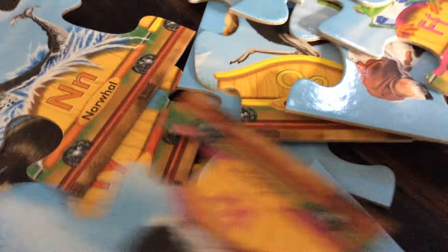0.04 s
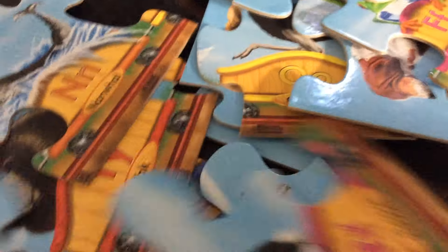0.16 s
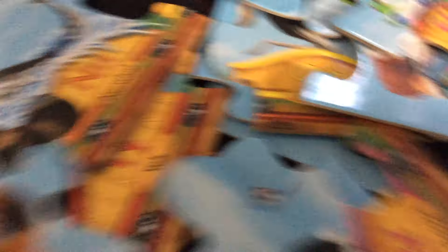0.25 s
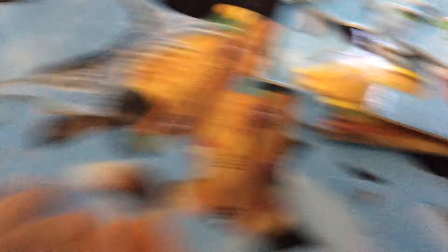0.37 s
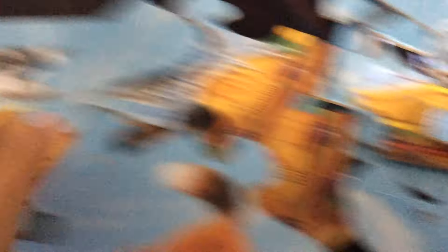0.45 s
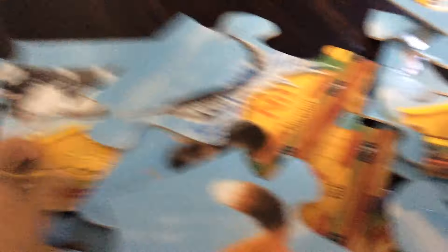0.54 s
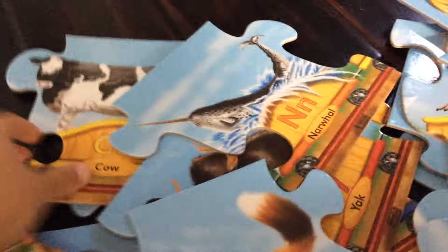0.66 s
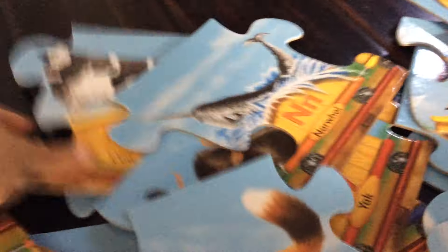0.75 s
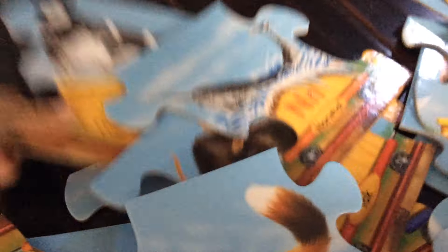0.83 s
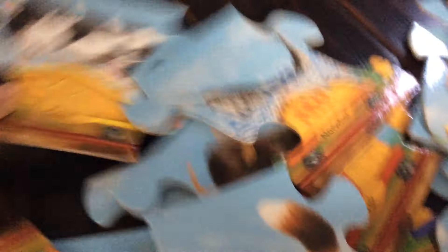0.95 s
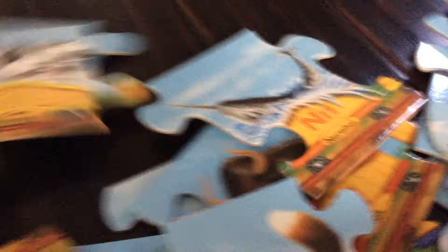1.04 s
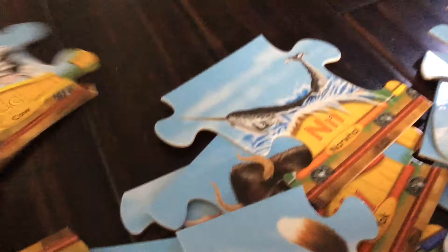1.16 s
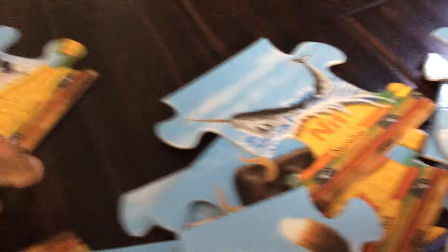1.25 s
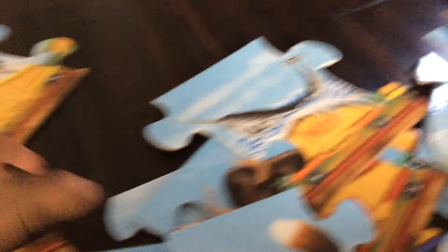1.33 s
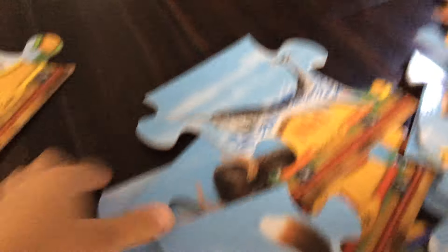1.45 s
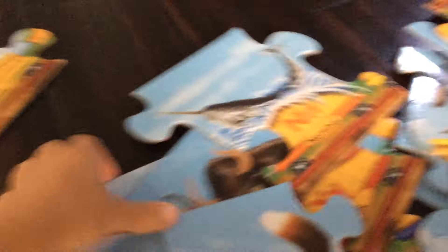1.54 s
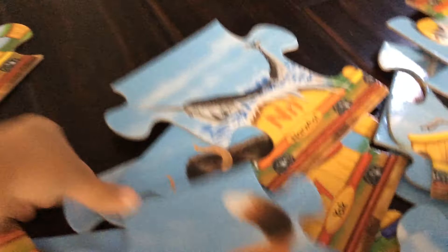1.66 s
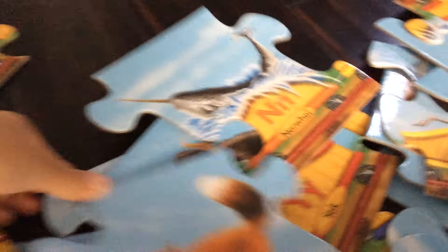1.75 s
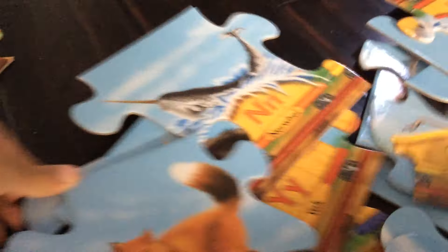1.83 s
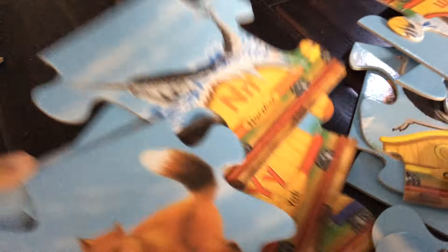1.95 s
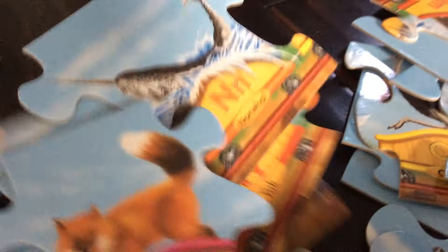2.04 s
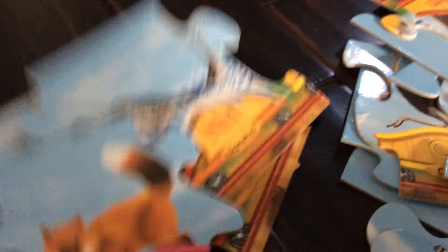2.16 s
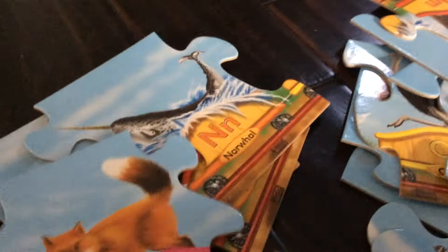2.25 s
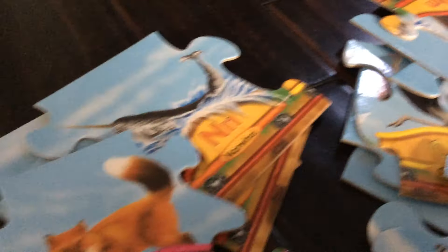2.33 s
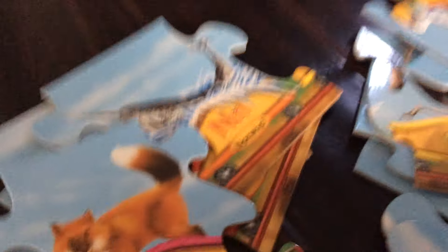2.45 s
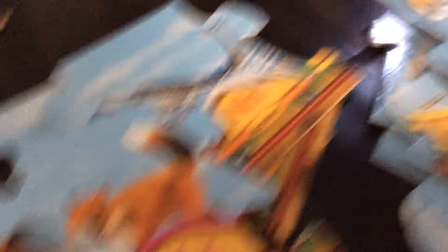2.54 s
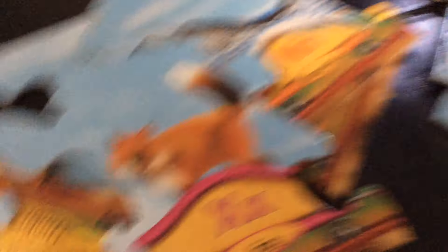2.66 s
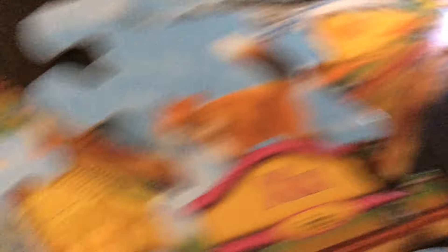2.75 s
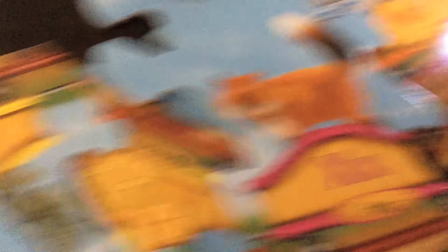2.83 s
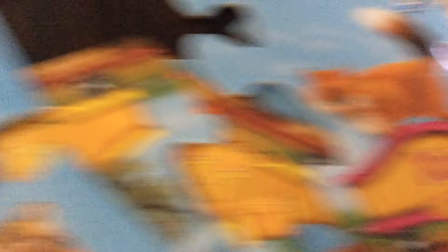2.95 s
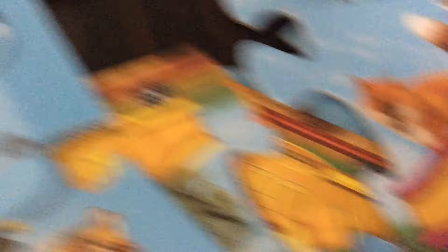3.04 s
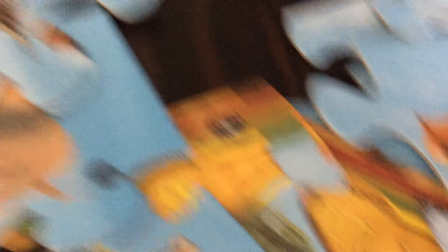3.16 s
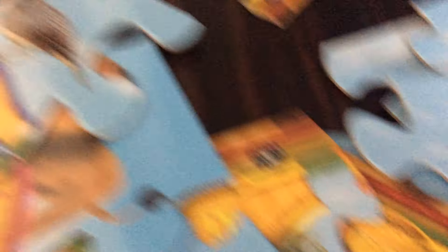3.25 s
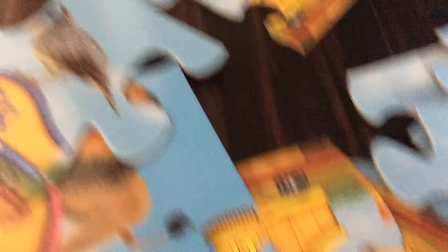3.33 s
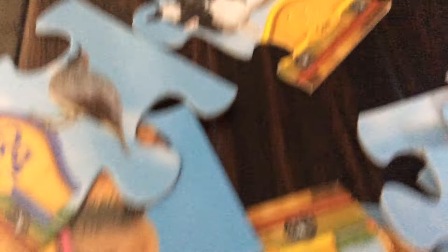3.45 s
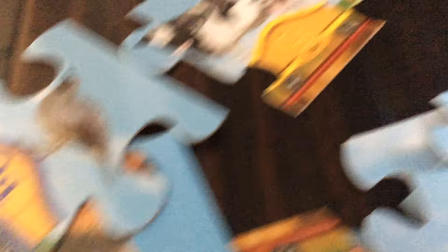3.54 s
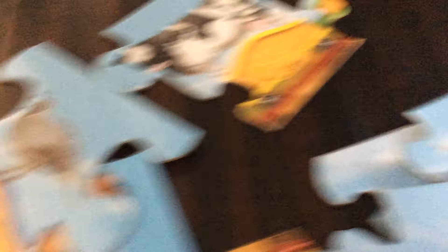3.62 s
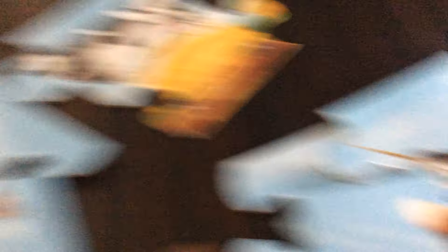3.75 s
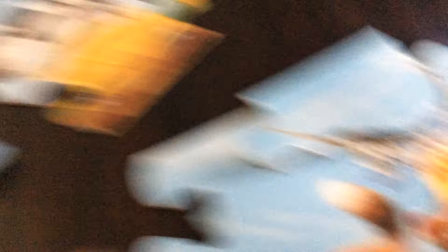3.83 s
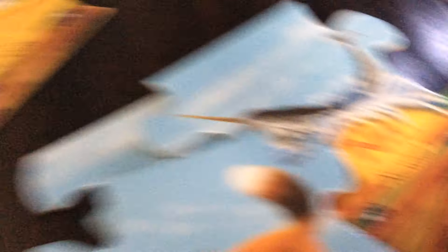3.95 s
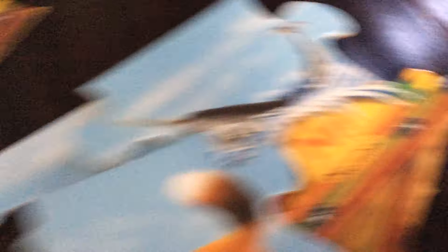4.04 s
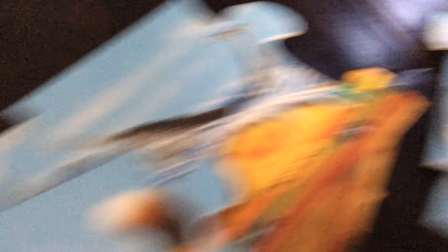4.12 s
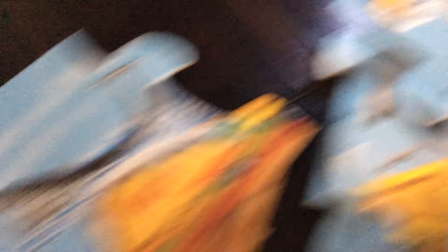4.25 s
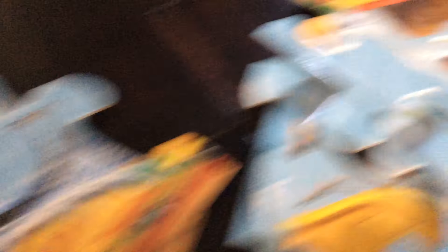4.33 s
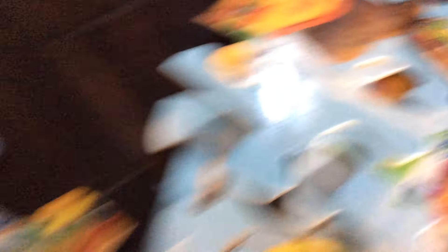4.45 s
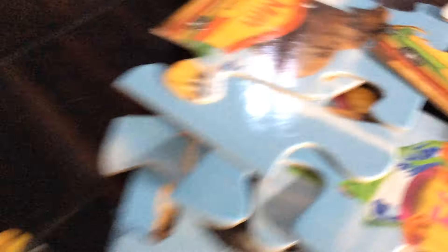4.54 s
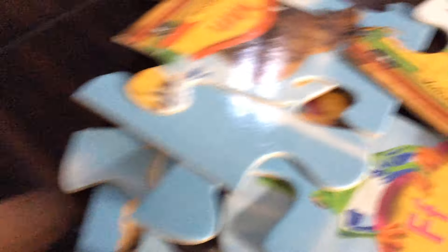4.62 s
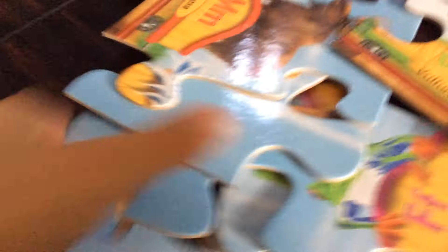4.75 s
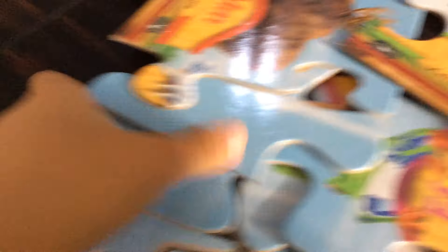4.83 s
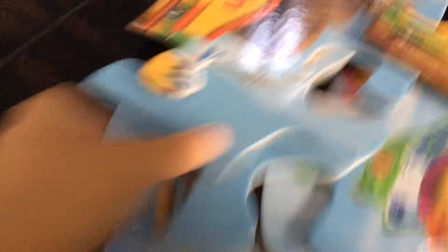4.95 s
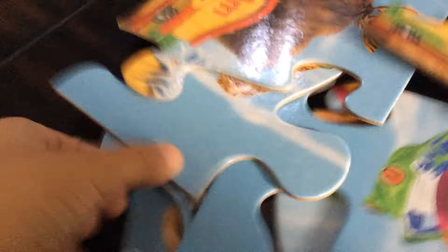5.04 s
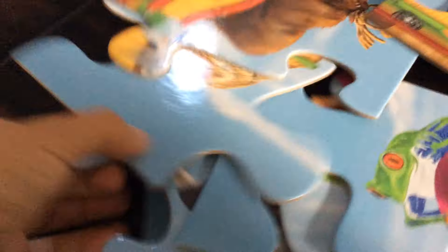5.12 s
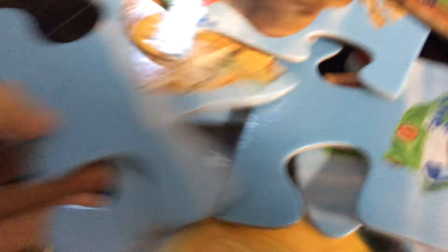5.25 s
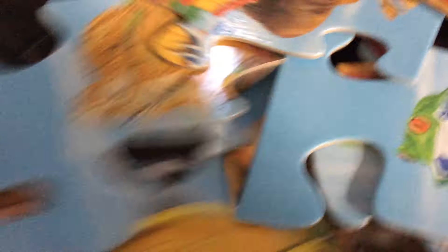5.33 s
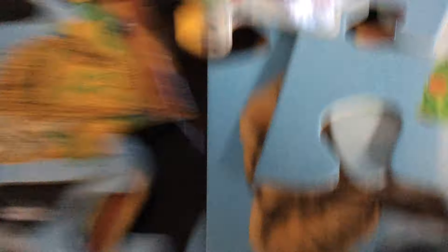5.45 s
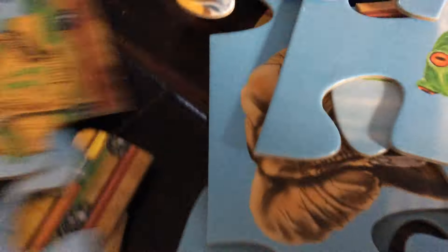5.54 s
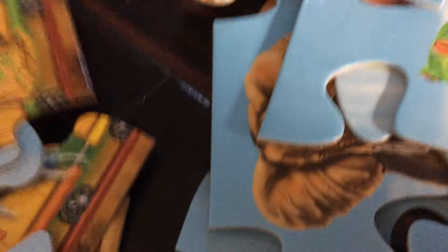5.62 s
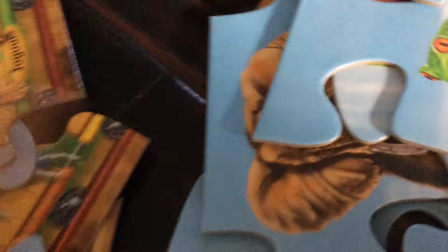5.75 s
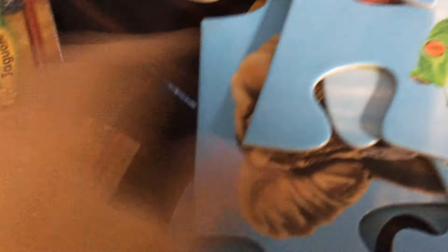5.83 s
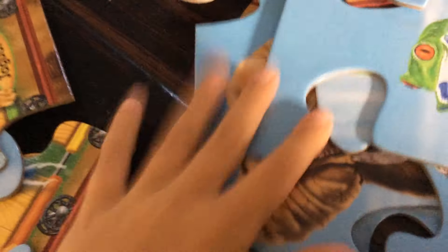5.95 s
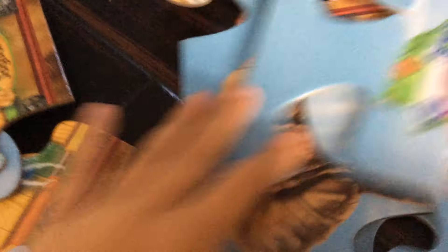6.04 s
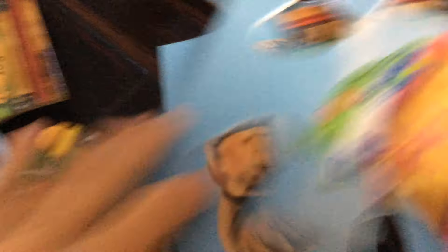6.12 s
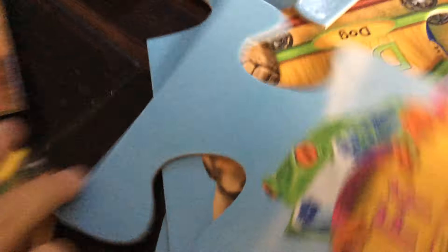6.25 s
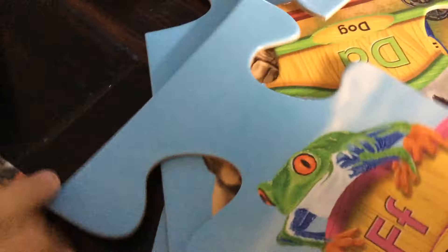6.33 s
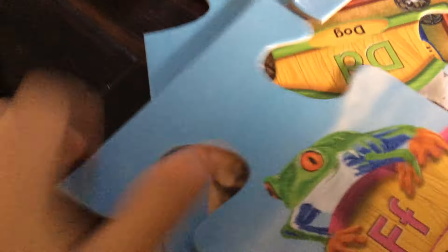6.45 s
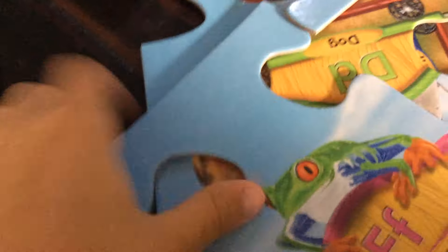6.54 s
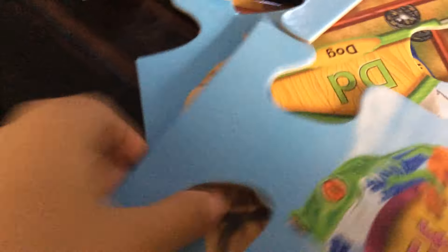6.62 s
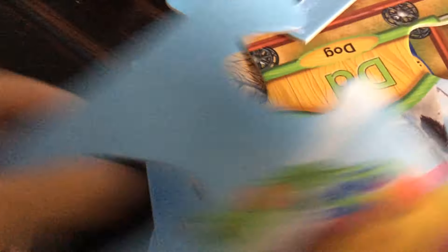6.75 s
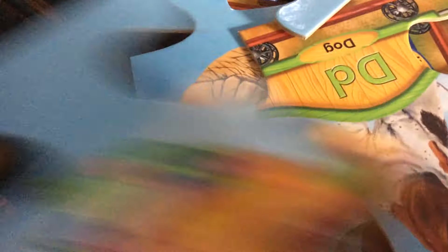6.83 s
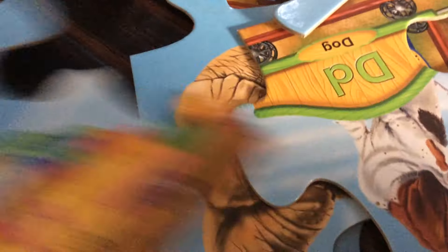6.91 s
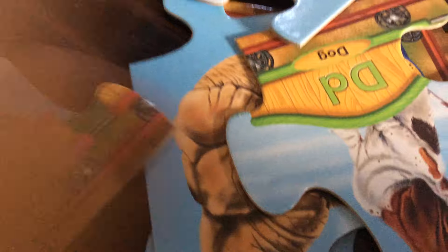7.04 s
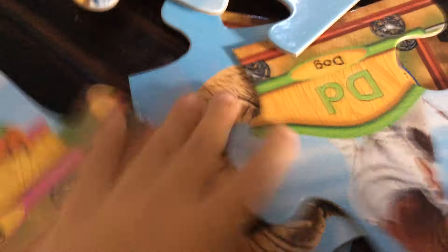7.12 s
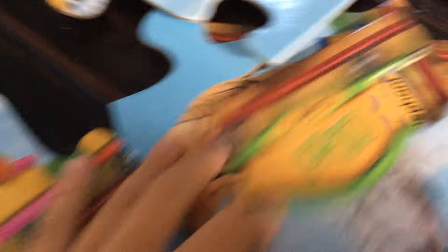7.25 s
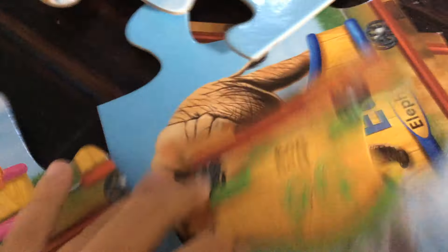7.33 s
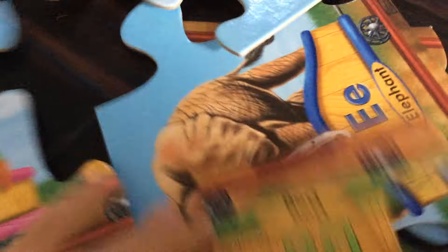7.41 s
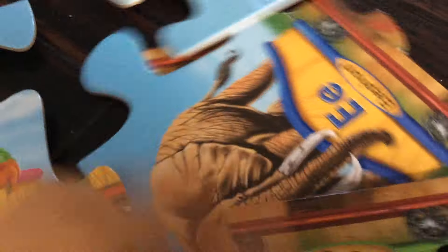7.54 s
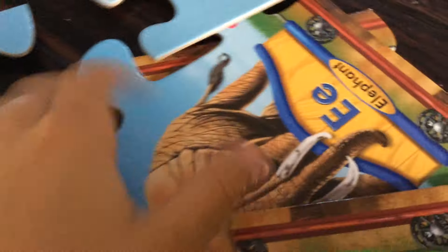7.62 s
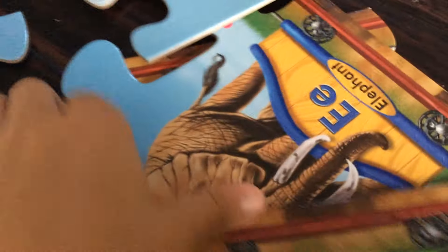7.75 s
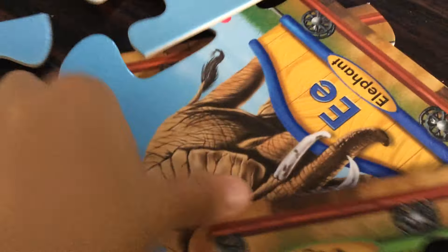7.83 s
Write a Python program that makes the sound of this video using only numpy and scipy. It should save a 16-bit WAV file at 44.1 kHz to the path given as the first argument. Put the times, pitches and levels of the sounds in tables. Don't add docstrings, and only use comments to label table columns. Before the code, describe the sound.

Close, dry indoor handling of stiff card pieces: flat slaps, edge ticks, short rattles and hissing rubs. After a couple of seconds a loud crack with a low thump lands, then there is near silence with soft hiss and hum and a few tiny ticks. Shuffling returns in bursts of knocks and papery scrapes, including a short muffled air gust, continuing until the end.

```python
import sys
import numpy as np
from scipy import signal
from scipy.fft import rfft, irfft, next_fast_len
from scipy.io import wavfile
from scipy.ndimage import uniform_filter1d, map_coordinates

SR = 44100
rng = np.random.default_rng(int(sys.argv[2]) if len(sys.argv) > 2 else 0)


def waveform_to_disk(signal):
    frames = np.transpose(np.atleast_2d(signal))
    scaled = np.clip(frames, -1, 1) * 32767
    samples = np.round(scaled).astype(np.int16)
    wavfile.write(sys.argv[1], SR, samples)


def elevation(decibels):
    levels = np.asarray(decibels, float)
    return 10 ** (levels / 20)


N = 347463

HUMP, DAB_HUMP = 0.19, 0.034
TAP_THUD_DB, TAP_S = -21.5, 0.019
DAB_EDGE_DB, DAB_THUD_DB = -37, -20
BUMP_S = 0.018


def unit(x):
    return x / np.sqrt(np.mean(x ** 2) + 1e-20)


def along(points, hz):
    f, v = np.transpose(points)
    return np.interp(np.log(hz + 1), np.log(f + 1), v)


def curves(rows):
    s, *cols = np.transpose(rows)
    t = np.arange(N) / SR
    return [np.interp(t, s, c, left=c[0], right=c[-1]) for c in cols]


def wobble(rate):
    return map_coordinates(rng.standard_normal(int(N * rate / SR) + 4), [np.arange(N) * rate / SR])


def filtered(x, response):
    m = next_fast_len(x.shape[-1] + 2048)
    return irfft(rfft(x, m) * response(np.fft.rfftfreq(m, 1 / SR)), m)[..., :x.shape[-1]]


def coloured(x, spectrum):
    return unit(filtered(x, lambda hz: elevation(along(spectrum, hz)) * (hz > spectrum[0][0] / 2)))


def mode(f, hz, width):
    return 1j * f * width / (hz * hz - f * f + 1j * f * width)


def peak_one(rows, size):
    return rows / np.sqrt(uniform_filter1d(rows ** 2, size, axis=1).max(1, keepdims=True))


# pitch_hz, density_db (per Hz)
ROOM_AIR = [(60, -35), (150, -14.5), (260, -17.5), (450, -23), (900, -31.5), (1600, -25.5), (3500, -35.5),
            (6000, -36), (8000, -34.5), (8700, -37), (9400, -36), (10000, -40.5), (12000, -43.5),
            (16000, -61)]
# pitch_hz, level_db (rms)
APPLIANCE = [(60, -71), (123.8, -78), (192, -77.5), (248, -86), (379, -89), (298, -73), (628, -88)]
# time_s, level_db
RUMBLE_LEVEL = [(0.0, -62), (1.3, -63.5), (2.26, -67.5), (2.3, -43), (2.42, -61.5), (3.49, -76),
                (5.16, -75.5), (6.56, -67.5), (6.76, -65), (6.85, -67), (7.88, -71)]
# pitch_hz, density_db (per Hz)
RUMBLE_COLOUR = [(25, -21.5), (55, -4), (85, 4), (130, 4.5), (200, -32.5)]


def quiet():
    t = np.arange(N) / SR
    tones = 0
    for hz, db in APPLIANCE:
        level = elevation(db + 2.0 + (1.5 + 1.5 * (hz < 90)) * wobble(4.8))
        tones = tones + level * np.sin(2 * np.pi * hz * t + 0.33 * wobble(2.7))
    rumble = elevation(curves(RUMBLE_LEVEL)[0] - 6.5) * coloured(rng.standard_normal(N), RUMBLE_COLOUR)
    air = elevation(-70.0 + 0.43 * wobble(2.1)) * coloured(rng.standard_normal(N), ROOM_AIR)
    return tones + rumble + air


# pitch_hz, density_db (per Hz)
CRACK_COLOUR = [(1500, -37), (3000, 4.5), (4500, 1), (8000, -2.5), (11000, -11.5), (16000, -22)]
# pitch_hz, width_hz, level_db
FLOOR_MODES = [(212, 78, -4), (352, 150, -6), (527, 91, -6.5), (745, 63, -11)]


def contacts(table, size):
    s, card_db, hz, crack_db, thud_db, t60, hump = table.T[:, :, None]
    t = np.arange(size) / SR
    lead = 64
    early = .004
    draw = rng.standard_normal((len(s), 3, size))

    def fade(t60s, rise):
        fall = elevation(-60 * (np.maximum(t - early, 0) / t60s) ** 1.24)
        return fall * np.exp(np.minimum(t - early, 0) / rise)

    spiky = draw[:, 0] * elevation(4.0 * draw[:, 1])
    spiky[:, round(early * SR)] = 6.8
    rattle = spiky * fade(np.clip(.82 * t60, .003, .2), 0.0002 + 0.018 * t60)
    over = 1.5 + .2 * draw[:, 2, :1]

    def card_body(f):
        soft = 1j * f / (0.17 * hz + 1j * f) / (1 + 1j * f / (4.1 * hz + 900)) ** 3
        own = mode(f, hz, 0.18 * hz) - 0.39 * mode(f, over * hz, 0.19 * hz)
        return (own + hump * mode(f, 2300, 2600)) * soft

    card = filtered(rattle, card_body)

    edge_hz = 6500 * np.exp(0.48 * draw[:, 2, 1:2])

    def edge(f):
        return elevation(along(CRACK_COLOUR, f)) * np.abs(2.3 + mode(f, edge_hz, 0.21 * edge_hz))

    sharp = (.6 * spiky + draw[:, 1]) * fade(np.clip(.4 * t60, .002, .2), .0002 + 0.016 * t60)
    crack = filtered(np.pad(sharp, ((0, 0), (lead, 0))), edge)[:, lead:]

    def floor(f):
        boards = sum((-1) ** k * elevation(db) * mode(f, c, w) for k, (c, w, db) in enumerate(FLOOR_MODES))
        return boards / (1 + 1j * f / 900)

    push = (2.6 * draw[:, 2] + spiky) * fade(0.021 + 0.87 * t60, 0.0013)
    thud = filtered(push, floor)

    rows = elevation(card_db) * peak_one(card, size=88)
    rows += elevation(crack_db) * peak_one(crack, size=88)
    rows += elevation(thud_db - 5.5) * peak_one(thud, size=264)
    at = np.round((s - early + .0005) * SR).astype(int) + np.arange(size)
    return np.bincount(at.ravel(), rows.ravel(), N + SR)[:N]




def tick_row(s, db, hz, t60):
    return s, db - 7.5, hz, db - 16, db - 26, t60, .03


# start_s, card_db, pitch_hz, t60_s
MORE_TICK_TIMES = [(.024, -48.5, 2500, 0.016), (.072, -39, 3000, 0.018), (0.419, -40, 1280, .03),
                   (.421, -41.5, 6400, .012), (.431, -35, 4050, .012), (.539, -59, 9000, .01),
                   (.822, -52, 6040, .012), (.844, -49, 3900, .012), (.875, -53, 5500, .015),
                   (.971, -45.5, 3920, .012), (1.017, -49, 1600, .02), (2.17, -44, 890, .03),
                   (2.226, -50, 2988, .015), (2.298, -36, 169.4, .05), (5.083, -37.5, 2530, .025),
                   (5.125, -33, 2980, 0.018), (5.1605, -40, 8500, .012), (5.238, -43, 10990, .03),
                   (5.474, -49, 8000, .012), (5.486, -61, 10010, .01), (6.985, -25, 3170, 0.028),
                   (6.985, -34, 7900, .012), (7.2021, -49, 9960, .012), (7.217, -50, 6500, .01),
                   (7.41, -53.5, 7900, .03), (7.63, -47, 8100, .012), (7.795, -53, 11990, .015),
                   (7.81, -52, 7500, .012), (4.54, -70, 11000, .03)]


def more_ticks():
    return [tick_row(*row) for row in MORE_TICK_TIMES]


# start_s, card_db, pitch_hz, crack_db
TAP_TIMES = [(0.0351, -27.5, 2040, -42), (0.4394, -32, 1870, -43.5), (0.4641, -34, 1780, -58),
             (0.8425, -39, 1200, -55.5), (1.5811, -30, 1490, -73), (1.6192, -43, 1880, -44),
             (4.9518, -32, 1680, -49), (5.396, -39.5, 2360, -46.5), (5.4435, -24, 1450, -63),
             (5.5306, -29, 1950, -46), (5.7514, -39.5, 2620, -51), (6.7303, -67, 3770, -48.5),
             (6.7414, -28, 3500, -36.5), (6.8803, -31.5, 1740, -60), (7.2435, -62, 1490, -51),
             (7.2834, -40, 1610, -49), (7.4597, -43, 2100, -43), (7.771, -36.5, 1970, -54)]


def taps():
    return [(s, db, hz, edge, db + TAP_THUD_DB, TAP_S, HUMP) for s, db, hz, edge in TAP_TIMES]


# start_s, card_db, pitch_hz, crack_db, thud_db
SLAP_TIMES = [(0.0442, -27.5, 1900, -27, -52), (0.427, -29, 2340, -59, -57), (0.635, -30, 1690, -49, -46.5),
              (0.6442, -30, 1630, -61, -45), (1.046, -33, 1150, -58, -58), (1.0579, -34, 1950, -39, -41),
              (1.1885, -35.5, 3200, -49, -45), (1.2902, -28.5, 1700, -64, -47.5),
              (1.5089, -43.5, 2850, -59, -45), (2.286, -19.5, 1380, -25.5, -36.5),
              (2.29, -13.5, 2190, -14.5, -33.5), (2.3368, -27.5, 1510, -38.5, -45.5),
              (5.148, -29, 1830, -35.5, -40), (5.1575, -21, 1870, -29.5, -43),
              (5.458, -25, 1600, -33.5, -50), (5.6992, -21, 2840, -27, -41), (5.708, -27.5, 1240, -36, -59),
              (6.2117, -34.5, 1860, -43, -48), (6.2285, -40.5, 2250, -43, -45),
              (6.243, -39.5, 1680, -53, -57), (6.3241, -36.5, 2060, -55, -46),
              (6.985, -22.5, 1530, -23, -38), (7.6264, -45.5, 2190, -50.5, -48),
              (7.8489, -37, 1230, -42.5, -40.5)]


def slaps():
    return [(s, db, hz, edge, thud + 2, 0.019, HUMP) for s, db, hz, edge, thud in SLAP_TIMES]


def grains(pitch_hz, count):
    when, tone, life = rng.random(count), rng.standard_normal(count), rng.random(count)
    size = rng.exponential(size=count)
    start = (when * N).astype(int)
    spread = np.exp(np.where(tone > 0, .55, .28) * tone)
    hz = np.clip(pitch_hz[start] * spread, 800, 9000)[:, None]
    t = np.arange(400) / SR
    cycles = 2 + 4 * life[:, None] ** 2
    level_db = 3 * np.minimum(size, 3)[:, None] - 25 * t * hz / cycles
    rows = elevation(level_db) * np.sin(2 * np.pi * hz * t)
    at = start[:, None] + np.arange(len(t))
    return unit(np.bincount(at.ravel(), rows.ravel(), N + SR)[:N])


def patchy(x, depth_db):
    z = signal.stft(x, nperseg=256)[2]
    field = uniform_filter1d(rng.standard_normal(z.shape), size=9, axis=0)
    field = uniform_filter1d(field, size=7, axis=1)
    return signal.istft(z * elevation(depth_db * unit(field)), nperseg=256)[1][:N]


# start_s, length_s, scrape_db,
# hiss_db (over scrape), pitch_hz
STROKE_TIMES = [(0.085, 0.016, -53.5, -8, 1890), (0.155, 0.1, -53.5, -4, 2097),
                (0.434, 0.052, -58, -7, 1580), (0.614, 0.23, -62, -10.5, 1559),
                (1.071, 0.047, -55, -3, 1583), (1.208, 0.031, -53, -13.5, 1974),
                (1.546, 0.22, -62.5, -6.5, 1678), (1.874, 0.072, -67, -16.5, 1296),
                (2.074, .13, -59, -5.5, 1254), (2.284, 0.055, -49.5, -13, 1718),
                (2.352, .02, -63.5, -1, 1898), (3.499, 0.69, -78, 0, 1750), (4.819, 0.072, -63.5, -2, 2100),
                (4.989, 0.127, -60.5, -2.5, 1933), (5.26, 0.27, -59, -4.5, 1860),
                (5.582, 0.069, -60, -2, 1900), (5.742, 0.26, -65.5, -4, 1928), (6.1, 0.28, -65, 4, 2130),
                (6.469, 0.074, -69.5, 5, 2370), (6.651, 0.079, -59.5, -7.5, 2186),
                (6.79, 0.17, -61.5, -7.5, 2010), (6.988, 0.095, -62, -5, 1710),
                (7.257, .1, -62.5, -5.5, 1714), (7.391, 0.21, -63, -1.5, 2200),
                (7.809, 0.033, -58, -12.5, 1882),
                (0.31, 0.09, -60.5, -5, 1670),
    (.55, 0.065, -84, -20, 1390),
    (0.888, 0.11, -68, -10, 1470),
    (1.306, 0.056, -67.5, -4.5, 1900),
    (1.763, 0.27, -69, -6, 1300),
    (2.44, 0.054, -64.5, -12.5, 1780),
    (4.26, 0.154, -75.5, 2.5, 1870),
    (4.424, 0.31, -74.5, -3.5, 1800),
    (7.102, 0.06, -64.5, -29, 1505),
    (7.637, 0.023, -67, -30, 1750),
]


def strokes():
    start, length, db, hiss_db, hz = np.array(STROKE_TIMES).T[:, :, None]
    t = np.arange(0, N + 64, 64) / SR
    rise_db = 210 * np.maximum(start - t, 0)
    fall_db = 226 * np.maximum(t - start - length, 0)
    power = elevation(db - rise_db - fall_db) ** 2 + 1e-30
    scrape = power.sum(0) ** .5
    hiss = (power * elevation(hiss_db) ** 2).sum(0) ** .5
    pitch_hz = (power * hz).sum(0) / power.sum(0)
    return curves(np.transpose([t, scrape, hiss, pitch_hz]))


# pitch_hz, density_db (per Hz)
SCRAPE_COLOUR = [(400, 2), (900, -7), (1400, 3.5), (2100, 2), (3000, -9.5), (4000, -1), (6000, -25.5)]
# pitch_hz, density_db (per Hz)
HISS_COLOUR = [(2500, 0), (4500, 0), (8000, 1), (11000, -5.5), (16000, -14)]


def slide():
    scrape, hiss, pitch_hz = strokes()
    grip = wobble(45)
    rub = coloured(patchy(rng.standard_normal(N) * elevation(1.6 * grip), depth_db=3.5), SCRAPE_COLOUR)
    grit = unit(elevation(1.6 * grip) * grains(pitch_hz, count=11000))
    fibres = rng.standard_normal(N) * elevation(0.39 * grip + 1.7 * wobble(72) + 1.0 * wobble(300))
    fine = coloured(patchy(fibres, depth_db=2.0), HISS_COLOUR)
    return scrape * (elevation(-6.5) * rub + elevation(-3.0) * grit) + hiss * fine


# start_s, card_db, pitch_hz, thud_db
BUMP_TIMES = [(0.087, -48, 1290, -60), (0.489, -40, 1150, -54), (0.494, -44, 1680, -55),
              (.551, -54, 1200, -72), (.579, -49, 1840, -58), (0.599, -44, 1290, -54),
              (0.754, -46, 1600, -59), (2.089, -43, 1080, -49.5), (2.12, -48, 950, -66),
              (2.243, -54, 1500, -60), (2.324, -36, 2970, -54), (3.549, -55.5, 855, -80),
              (3.638, -66, 700, -73), (6.131, -54, 692, -60), (6.16, -50, 990, -65),
              (6.188, -44, 1510, -50), (6.237, -43, 606, -49), (6.33, -54, 1500, -61),
              (7.298, -48, 1620, -61), (7.612, -48, 1280, -54)]


def bumps():
    return [(s, db, hz, db + DAB_EDGE_DB, thud, BUMP_S, DAB_HUMP) for s, db, hz, thud in BUMP_TIMES]


# start_s, card_db, pitch_hz, crack_db
RATTLE_TIMES = [(0.098, -37.5, 1660, -45.5), (0.4497, -35.5, 1840, -63), (0.6086, -44, 1870, -54.5),
                (0.6755, -29, 1080, -51), (0.812, -34, 1420, -54), (1.069, -28.5, 1880, -39),
                (1.1756, -32, 1580, -46.5), (1.2842, -34.5, 1690, -42), (1.589, -29.5, 1480, -50),
                (1.6866, -39.5, 1530, -53), (1.8214, -40.5, 1190, -45.5), (2.1735, -36.5, 1050, -51),
                (2.3478, -29.5, 1180, -35.5), (2.3957, -44.5, 2897, -62.5), (5.0408, -45, 1985, -55),
                (5.078, -38, 1780, -47), (5.1224, -30, 1900, -40), (5.1979, -27, 1920, -35.5),
                (5.4182, -37, 1530, -45), (5.521, -32, 1380, -40.5), (5.735, -36.5, 2420, -51),
                (7.0272, -40, 1760, -44), (7.1013, -42, 1520, -55), (7.2115, -40.5, 1820, -51),
                (7.7454, -32, 1330, -46.5)]


def rattles():
    return [(s, db, hz, edge, db - 21, .03, HUMP) for s, db, hz, edge in RATTLE_TIMES]


# start_s, length_s, pitch_hz
STREAK_TIMES = [(.15, .03, 1900), (.185, .05, 2100), (.188, .045, 3900), (.182, .04, 6500),
                (.25, .04, 2850), (.385, .015, 2600), (1.05, .07, 7000), (1.09, .04, 4300),
                (1.205, .025, 3800), (1.51, .05, 2800), (2.11, .045, 1100), (2.1, .055, 3200),
                (2.178, .014, 3300), (3.78, .1, 1600), (5.655, .014, 7500), (6.71, .01, 6800),
                (6.81, .07, 3600), (6.885, .02, 8000), (6.888, .018, 3300), (6.89, .014, 11500),
                (6.948, .012, 8800), (7.066, .004, 8000), (7.3, .08, 1500), (7.4, .1, 3200),
                (7.43, .04, 6500), (7.47, .13, 2200), (7.83, .02, 3400)]
STREAK_LEVELS = [-62, -56, -58, -65, -61, -65, -69, -58.5, -59, -69, -64, -69, -57, -75, -63.5, -60, -69,
                 -57.5, -61, -60, -66, -51.5, -73, -65.5, -70, -68.5, -58]


def streaks():
    s, length, hz = np.array(STREAK_TIMES).T[:, :, None]
    t = np.arange(SR // 4) / SR - .04
    noise = rng.standard_normal((len(s), len(t)))
    rub = filtered(noise, lambda f: mode(f, hz, .25 * hz) ** 2)
    outside = np.maximum(np.maximum(-t, t - length), 0)
    hold = np.exp(-(outside / .006) ** 2)
    rows = elevation(STREAK_LEVELS)[:, None] * hold * rub / rub.std(axis=1, keepdims=True)
    at = np.round((s + t) * SR).astype(int)
    return np.bincount(at.ravel(), rows.ravel(), N + SR)[:N]


# start_s, level_db, pitch_hz
SNAP_TIMES = [(.799, -43, 4150), (.82, -54, 3250), (1.262, -58, 7000), (2.0567, -40.5, 4130),
              (3.4836, -51.5, 8500), (3.937, -56.5, 7210), (4.7544, -35.5, 4840), (5.241, -31, 4760),
              (5.661, -42.5, 6600), (5.889, -45, 3030), (6.121, -61, 8000), (6.187, -47, 4300),
              (6.3153, -30.5, 4030), (6.625, -50, 6500), (6.772, -54, 7000), (6.975, -44, 6500),
              (7.068, -44, 8500), (7.2014, -40.5, 3600), (7.646, -60, 2920), (7.7866, -49.5, 8000),
              (1.17, -39, 1800), (1.2007, -39, 3380), (1.271, -38, 1800), (2.11, -45, 4020),
              (2.148, -46, 4930), (0.256, -36.5, 2790), (5.448, -40, 6500)]


def snaps():
    return [(s, db - 3.5, hz, db - 9, db - 26, 0.0194, HUMP) for s, db, hz in SNAP_TIMES]


# start_s, card_db, pitch_hz, crack_db
SKID_TIMES = [(0.4226, -40, 2020, -41), (1.0799, -32.5, 1170, -48.5), (1.0901, -36.5, 1870, -40.5),
              (1.2166, -41.5, 1820, -40), (1.6034, -44, 1860, -52.5), (4.7934, -50, 1100, -50.5),
              (5.2324, -36.5, 1790, -45.5), (5.4374, -42, 1510, -65), (6.2847, -42.5, 1590, -46),
              (6.8938, -49, 3180, -45.5), (7.2345, -38, 1500, -48.5)]


def skids():
    return [(s, db, hz, edge, db - 14, 0.074, HUMP) for s, db, hz, edge in SKID_TIMES]


# start_s, card_db, pitch_hz
NICK_TIMES = [(.432, -37, 745), (.445, -39, 684), (.775, -53, 1420), (1.082, -39, 2600), (1.122, -37, 1690),
              (1.19, -52, 2920), (1.639, -47, 1900), (1.71, -46, 1700), (4.804, -49, 1515),
              (5.161, -22.5, 1740), (5.178, -42, 2200), (5.205, -34, 1790), (5.467, -44, 1980),
              (5.512, -45, 2400), (5.626, -46.5, 2000), (6.991, -23.5, 1620), (7.715, -54, 1200),
              (7.751, -33, 2120)]


def nicks():
    return [(s, db, hz, db - 15, db + TAP_THUD_DB, TAP_S, HUMP) for s, db, hz in NICK_TIMES]


# start_s, card_db, pitch_hz
DAB_TIMES = [(0.5143, -23.5, 1230), (0.537, -36, 1130), (0.6947, -33.5, 1560), (0.882, -48.5, 1240),
             (0.972, -33, 1260), (1.807, -42.5, 1140), (1.8612, -42.5, 1160), (1.944, -46, 1090),
             (1.992, -49.5, 1490), (2.011, -43.5, 1180), (2.2233, -36.5, 1110), (2.48, -54, 1840),
             (3.5486, -54, 1350), (4.956, -50, 1790), (5.471, -34, 2180), (5.9888, -49, 2670),
             (6.0224, -57, 2220), (6.0388, -51, 2540), (6.458, -47.5, 1890), (6.753, -32.5, 2000),
             (6.801, -47.5, 1312), (7.148, -50.5, 1430), (7.7198, -51, 2130), (7.7603, -43, 1470),
             (7.8017, -35.5, 2030)]


def dabs():
    return [(s, db, hz, db + DAB_EDGE_DB, db + DAB_THUD_DB, 0.026, DAB_HUMP) for s, db, hz in DAB_TIMES]


# start_s, card_db, pitch_hz, t60_s
TICK_TIMES = [(.638, -50, 6400, 0.014), (.708, -48, 1900, 0.018), (1.063, -31, 1500, .03),
              (1.0715, -34, 14500, .015), (1.074, -35, 2440, 0.017), (1.0875, -36.5, 4400, 0.033),
              (1.0885, -43, 12000, .012), (1.135, -46, 12500, .012), (1.147, -49, 1500, 0.014),
              (1.176, -48, 12000, .01), (1.209, -52, 7000, .012), (1.21, -44, 510, 0.016),
              (1.259, -50, 11000, .015), (2.276, -45, 6500, .03), (2.278, -50, 2000, .02),
              (2.314, -31, 1900, 0.046), (2.316, -41, 8800, .012), (2.348, -42, 8450, 0.0099),
              (2.357, -43.5, 2000, .012), (6.227, -44, 6190, .012), (6.237, -45, 8000, .01),
              (6.314, -35.5, 8100, 0.013), (6.3145, -36, 6060, 0.014), (6.692, -53, 1600, .02),
              (6.71, -45, 2500, .03), (7.062, -55, 11000, .015), (.631, -41, 352, 0.018),
              (6.5765, -45, 450, 0.013), (6.69, -48, 480, 0.054), (.615, -52, 3700, 0.066)]


def ticks():
    return [tick_row(*row) for row in TICK_TIMES]


# start_s, level_db, pitch_hz
THUMP_TIMES = [(.645, -55, 285), (1.509, -43.5, 265), (2.292, -27, 290), (4.805, -48.5, 222),
               (4.96, -45.5, 294), (5.16, -46, 212), (5.452, -43.5, 164), (5.707, -31.5, 236),
               (6.24, -46, 225), (6.329, -48, 278), (7.852, -51, 330)]


def thumps():
    return [(s, db, hz, db - 41.5, db - 17.5, BUMP_S, 0) for s, db, hz in THUMP_TIMES]


# start_s, card_db, pitch_hz, crack_db, t60_s
TOPPLE_TIMES = [
    (2.258, -32.5, 2100, -61, 0.018),
    (2.264, -31.5, 1300, -66, 0.021),
    (2.271, -34, 1420, -42.5, .03),
    (2.303, -26, 1500, -47, 0.088),
]


def topple():
    return [(s, db, hz, edge, db + TAP_THUD_DB, t60, HUMP) for s, db, hz, edge, t60 in TOPPLE_TIMES]


# time_s, level_db, speed (relative)
PUFF_CURVE = [
    (6.575, -51, 2.3),
    (6.6, -45, 1.23),
    (6.63, -42.5, 0.89),
    (6.665, -50, 0.8),
    (6.69, -54, 1.8),
    (6.73, -58, 0.79),
    (6.8, -56, 0.76),
]
# pitch_hz, density_db (per Hz)
PUFF_COLOUR = [(35, -21), (90, 2), (160, -4), (260, -6.5), (400, -17.5), (700, -28.5), (3000, -100)]


def puff():
    t = np.arange(N) / SR
    air_db, speed = curves(PUFF_CURVE)
    fade_in = np.clip((t - 6.574) / 0.0007, 0, 1)
    fade_out = np.clip((PUFF_CURVE[-1][0] - t) / 0.033, 0, 1)
    inside = fade_in * fade_out
    passed = np.cumsum(np.clip(speed, .3, 3) * (inside > 0))
    eddies = coloured(rng.standard_normal(N), PUFF_COLOUR)
    return inside * elevation(air_db) * np.interp(passed, np.arange(N), eddies)


# pitch_hz, t60_s
ROOM_DECAY = [(200, 0.26), (2000, 0.074), (10000, 0.017)]


def room(x):
    hz, t, z = signal.stft(rng.standard_normal(SR // 2), SR, nperseg=256)
    decay = elevation(-60 * t / along(ROOM_DECAY, hz)[:, None])
    tail = signal.istft(z * decay, SR, nperseg=256)[1]
    return signal.fftconvolve(np.pad(x, (150, 0)), tail / np.linalg.norm(tail))[:N]


def blows():
    rows = slaps() + taps() + rattles() + skids() + dabs()
    rows += topple() + snaps() + bumps() + thumps() + nicks()
    return np.array(rows) + [0, -7.5, 0, -4, 0, 0, 0]


def scene():
    hits = contacts(blows(), size=SR // 10)
    mix = hits + elevation(-15.5) * room(hits) + slide() + streaks() + puff() + quiet()
    mix += contacts(np.array(ticks() + more_ticks()), size=SR // 16)
    return mix[None]


def roll_off(x):
    return signal.sosfilt(signal.butter(12, 16064, fs=SR, output="sos"), x)


def record(dry):
    mix = filtered(dry, lambda hz: hz < 15814)
    return roll_off(mix)


dry = scene()
out = record(dry)
waveform_to_disk(out)
```